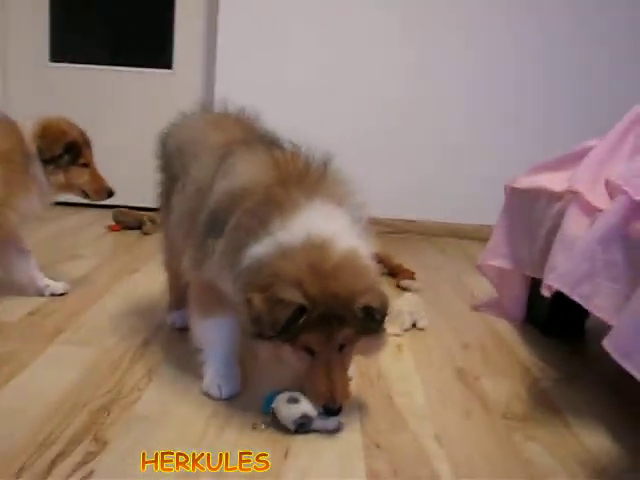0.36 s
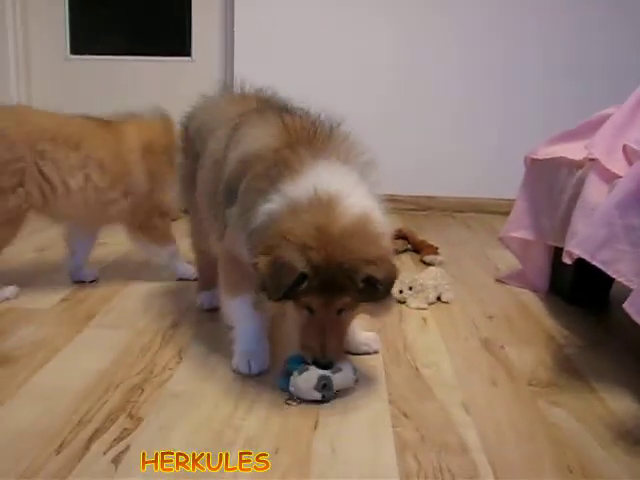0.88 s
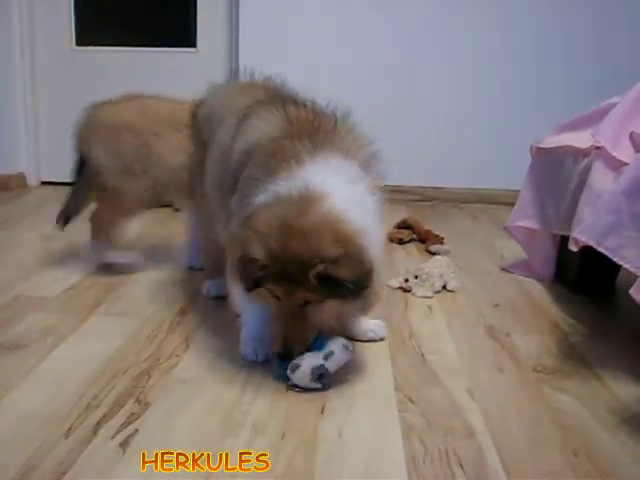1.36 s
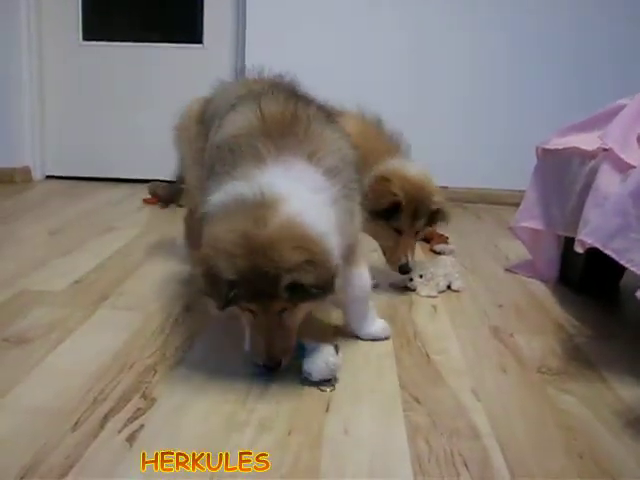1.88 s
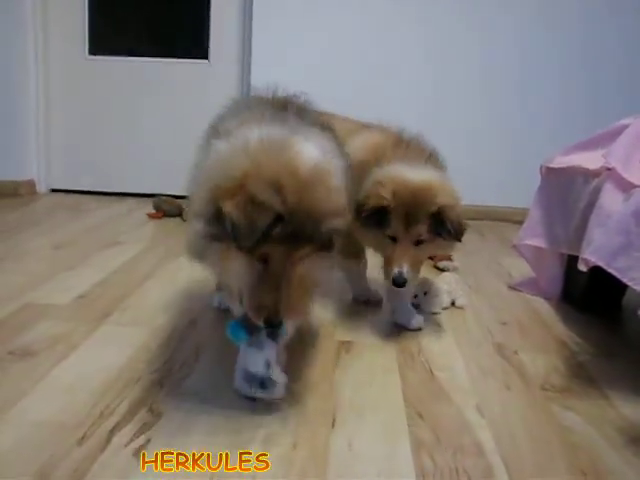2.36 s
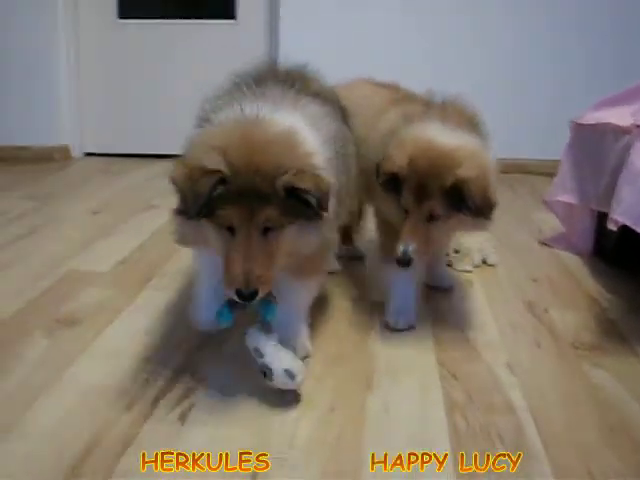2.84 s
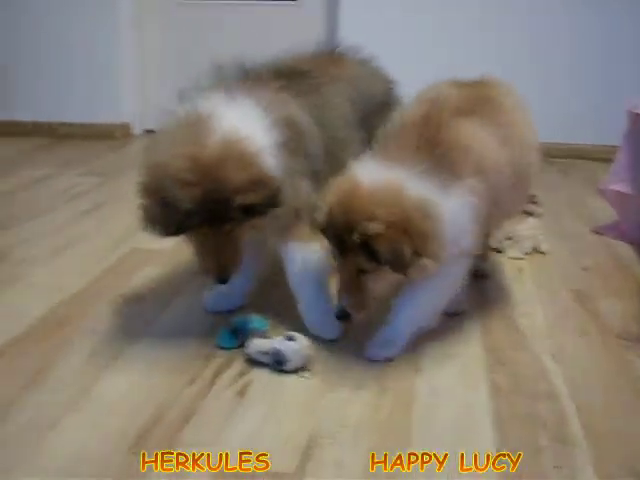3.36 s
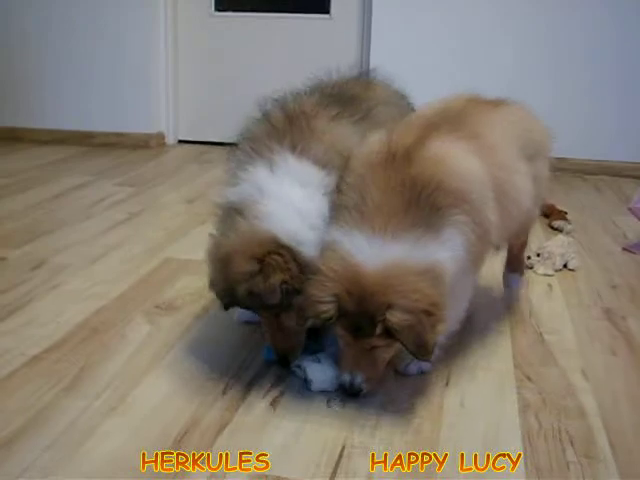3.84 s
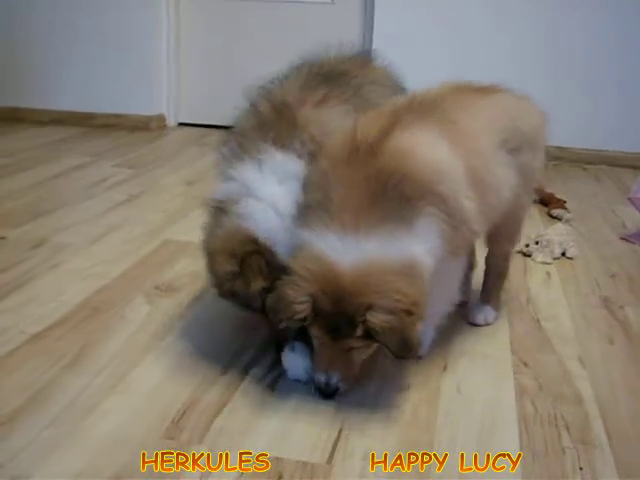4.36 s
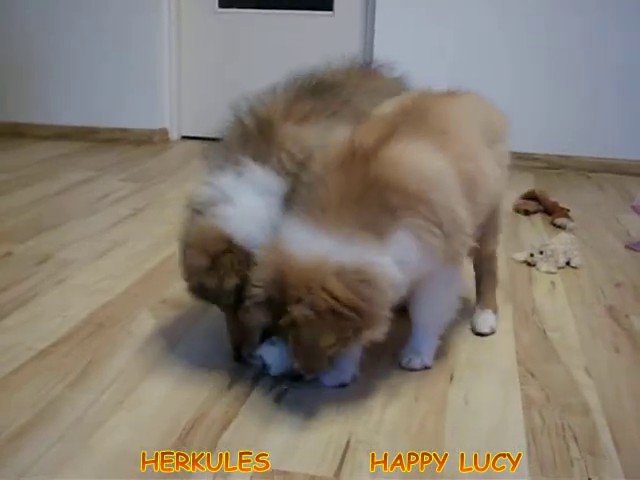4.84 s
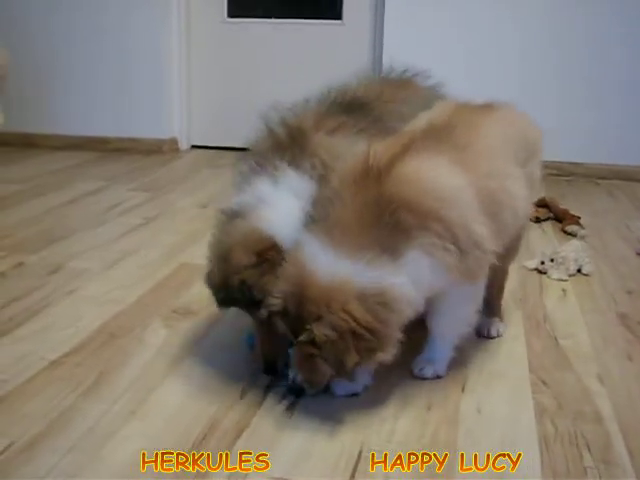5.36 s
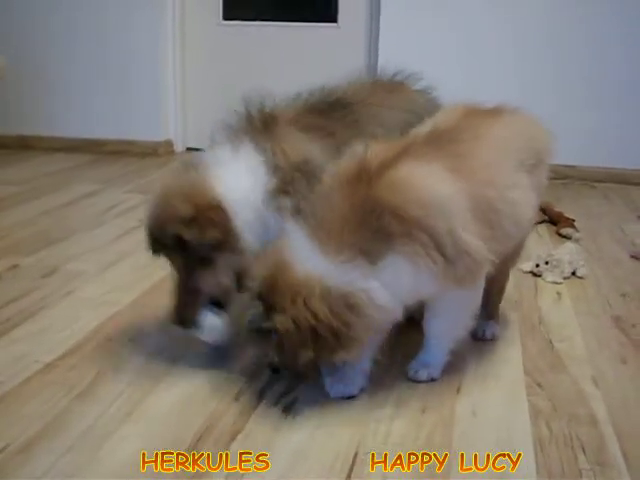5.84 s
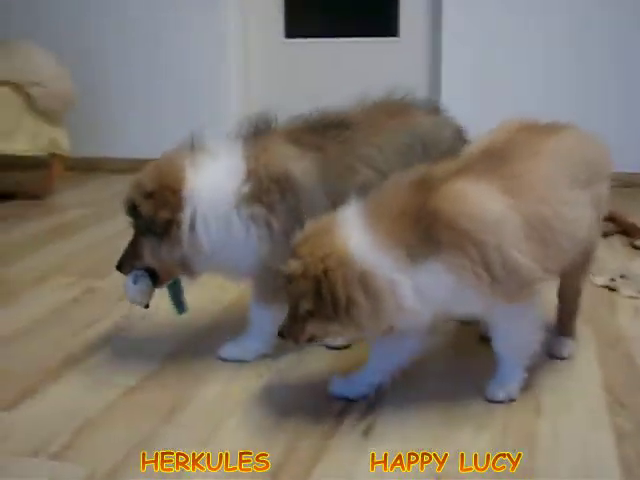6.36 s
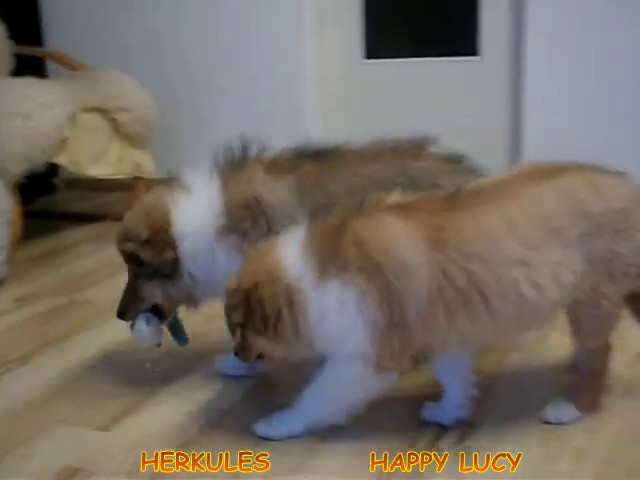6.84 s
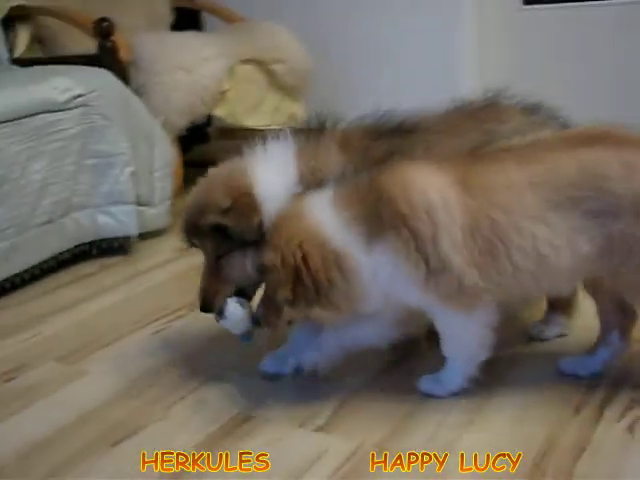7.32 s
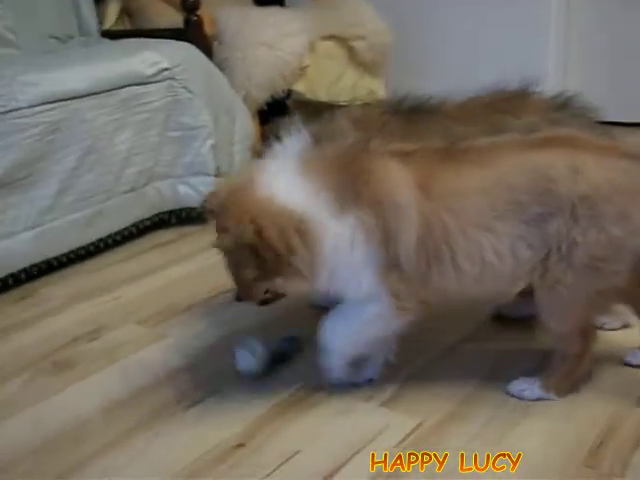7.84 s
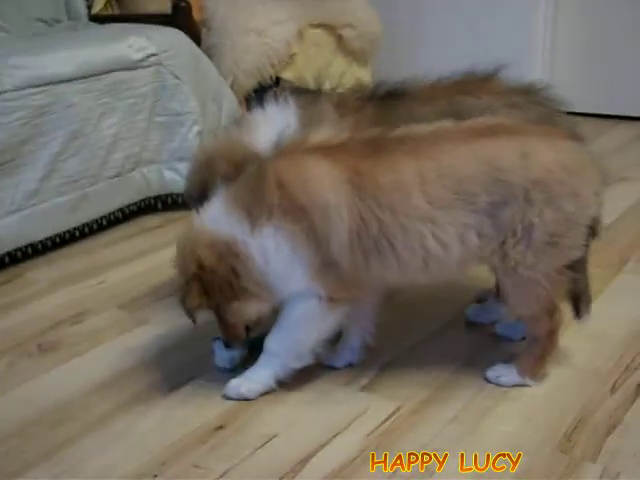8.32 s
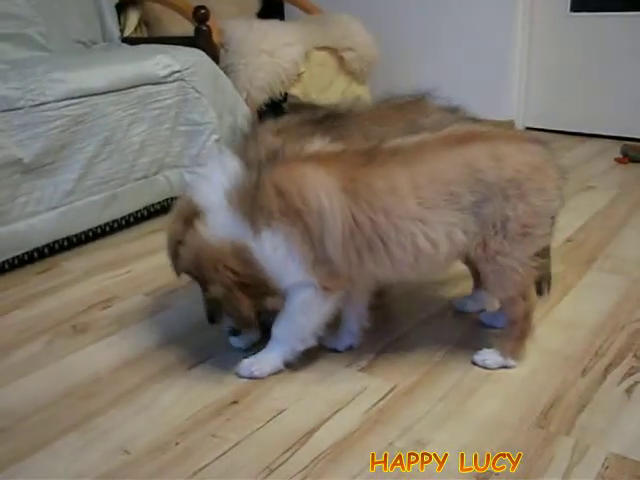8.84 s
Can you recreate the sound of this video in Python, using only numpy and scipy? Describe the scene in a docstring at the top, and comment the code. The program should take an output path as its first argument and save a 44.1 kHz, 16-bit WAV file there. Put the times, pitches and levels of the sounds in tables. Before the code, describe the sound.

Close, bright crumpling and sharp foil pops in a small room, quiet stretch, then one loudest snap with knocks and handling rubs near the end.

```python
"""From the start two puppies chew, paw and drag a crinkly toy over a wooden floor in a small room: its foil
crackles by dense tiny buckles and snaps by single large ones. Throughout, room hiss is filtered noise, a low
hum comes and goes as resonant noise, the camera's sensor whines as a flipping tone and its lens motor buzzes
in spells of pulsed noise. Knocks ring its casing now and then; near 7.9 s comes the loudest snap, gain control
ducks after it, and a hand rubs the casing by stick-slip; near 9.1 s a pad scuffs the boards."""
import sys
import numpy as np
from scipy import signal
from scipy.fft import rfft, irfft, next_fast_len
from scipy.io import wavfile
from scipy.ndimage import uniform_filter1d

SR = 44100
rng = np.random.default_rng(int(sys.argv[2]) if len(sys.argv) > 2 else 0)


def master(y):
    """Save y as 16-bit WAV."""
    cut = np.clip(np.atleast_2d(y).T, -1, 1)
    pcm = np.round(cut * 32767)  # scale
    wavfile.write(sys.argv[1], SR, pcm.astype(np.int16))


def elevation(decibels):
    """Turn decibel levels (scalar or array-like) into linear amplitude ratios."""
    levels = np.asarray(decibels, float)
    return 10 ** (levels / 20)


N = 405719  # length in samples

# Each bite or drag crumples the foil:
# (time at full strength [s], hold [s], bright crackle level [dB], dull over bright [dB])
BITES = [(.02, 0.06, -48, -2.5), (.24, 0.064, -58.5, -1), (0.488, 0.045, -51, -1.5), (.715, 0.016, -42, 1),
         (.95, 0.058, -49.5, -1.5), (1.135, 0.013, -40.5, -3.5), (1.395, 0.026, -48, -0.5),
         (1.52, 0.13, -54.5, 1), (1.7, 0.075, -47.5, -1), (1.83, 0.11, -48, 0.5), (2.02, 0.024, -50, -1),
         (2.12, 0.091, -47.5, -3), (2.208, 0.12, -38, -5.5), (2.39, 0.0089, -46, -6),
         (2.578, 0.028, -30.5, -2.5), (2.689, .01, -31, -5), (2.77, 0.2, -40.5, -3), (2.955, .005, -30, -8),
         (2.99, 0.12, -40, -1.5), (3.24, 0.038, -46.5, -3.5), (3.35, 0.12, -57.5, -1.5),
         (3.494, 0.004, -46, -6), (3.6, 0.0097, -39.5, -6.5), (3.659, 0.052, -38, -6),
         (3.83, 0.059, -43.5, -5), (3.96, 0.11, -56, 3), (4.176, 0.014, -44.5, -3),
         (4.272, 0.15, -52, -5.5), (4.46, 0.04, -49.5, -10), (4.516, 0.056, -36, -8),
         (4.641, 0.084, -40, -2.5), (4.82, .01, -35.5, -6.5), (4.932, 0.056, -42, -2.5),
         (5.01, 0.044, -41.5, -6.5), (5.15, 0.072, -44, -6), (5.345, 0.013, -46.5, -5.5),
         (5.442, 0.1, -45, -4), (5.93, 0.0086, -52, -15), (6.3, 0.043, -65, -15), (6.49, 0.013, -41, -4),
         (6.575, 0.011, -42.5, -3.5), (6.83, 0.017, -50.5, -6.5), (6.863, 0.014, -46, 0),
         (7.034, .02, -44, -9.5), (7.277, 0.0051, -50, -3), (7.38, .04, -54, -4), (7.52, 0.033, -53, -6),
         (7.695, 0.0091, -45.5, -6.5), (7.835, 0.0078, -56, 0), (7.919, 0.012, -29, 4.5),
         (8.0, 0.011, -35.5, 2), (8.09, 0.061, -38.5, -2), (8.27, 0.023, -40.5, -1),
         (8.36, 0.18, -48, -3.5), (8.6, 0.029, -50, -1), (8.83, 0.089, -53, -4), (8.975, 0.0088, -44, -8),
         (9.01, 0.015, -37.5, -1), (9.132, .025, -37, -1.5)]
# Single snaps of the foil: (time [s], bright level [dB], dull over bright [dB])
SNAPS = [(0.0137, -25.5, -5.5), (.0901, -21.5, -9), (.682, -18.5, -10), (.7088, -14.5, 0.5),
         (1.1283, -19, -4), (1.391, -31.5, -0.5), (1.8229, -21.5, 2.5), (1.9, -29, 1.5), (2.2133, -23, -20),
         (2.2756, -16, -6), (2.5738, -7.5, -7.5), (2.5789, -5, -8), (2.582, -5.5, -6.5), (2.6715, -22, 3),
         (2.685, -10.5, -13), (2.689, -7.5, -8), (2.713, -19, -3), (2.7631, -5.5, -10),
         (2.8176, -8.5, -14.5), (2.863, -8.5, -11), (2.898, -15.5, -14), (2.926, -18, -14),
         (2.9463, -7.5, -15), (2.9502, -9.5, -18), (2.9982, -4.5, -14), (3.0908, -18.5, -8),
         (3.116, -19, -6), (3.6044, -17, -15), (3.6406, -9.5, -12), (3.6622, -17.5, -15),
         (3.7205, -22, -28), (4.171, -26, -0.5), (4.5203, -17, -13), (4.532, -23, -12), (4.543, -18, -8),
         (4.5633, -20, -11), (4.6566, -20.5, -7), (4.7536, -17, -9), (4.8035, -6.5, -12.5),
         (4.8164, -17, -19), (4.8202, -21, -11), (4.9444, -11.5, -5.5), (5.0109, -15, -11),
         (5.0403, -15, -11), (5.1469, -15.5, -16), (5.1611, -16, -14), (5.2035, -17.5, -13),
         (5.3105, -21.5, -19), (6.5678, -20.5, -11.5), (7.028, -21, -5.5), (7.6852, -21, -8),
         (7.8987, 3.5, -6.5), (7.9, -7, -8), (7.913, -15, -2), (7.916, -19, -3), (7.965, -9.5, -2.5),
         (7.9996, -7.5, -10), (8.0097, -12, -14), (8.088, -14.5, -7), (8.092, -12, -20), (8.1221, -19, -5),
         (8.129, -11, -14), (8.303, -13.5, -5.5), (8.3699, -24, -22), (9.0153, -12, -18),
         (9.0235, -14.5, -22)]
# Resonances of foil and microphone port: (frequency [Hz], width [Hz], relative level [dB])
BRIGHT_MODES = [(5380, 1306, 4), (6976, 1150, 8.5), (11700, 1600, -40)]
DULL_MODES = [(980, 586, 0), (1800, 1530, 0), (3500, 1570, 4.5)]
# Decay of the room: (frequency [Hz], time to fall 60 dB [s])
ROOM_DECAY = [(300, 0.15), (3000, 0.1), (8000, 0.057), (15000, 0.081)]
# A pad slides on the boards: (time [s], level [dB], fade [dB/s])
SCUFF = (9.063, -35.5, 210)
# Treble response of the microphone: (frequency [Hz], gain [dB])
PORT_RESPONSE = [(3000, -2), (5000, -1), (6800, -1.5), (7900, -1), (8700, -1), (9400, -11), (12000, -3),
                 (16000, -20)]
# Dull knocks, fingers on the casing or paws on the boards:
# (time [s], reference level [dB], left over right [dB], crack over reference [dB], thump over reference [dB])
TAPS = [(0.089, -34, 1.5, -16, -16), (0.283, -29.5, -1, -4.5, -33), (1.317, -34, -5, 3, -8.5),
        (4.17, -44.5, 2.5, -12, -4), (4.667, -46.5, -3, -15, -40), (4.703, -42.5, -3, -3, -19),
        (4.978, -52, 24, 4, 9), (6.145, -44, 6, -16, -26), (7.828, -32, -2, -13, -9),
        (7.839, -26, -2, -9, -12), (7.994, -28, 3, -10, -8.5), (8.02, -29, 2, -17, -22),
        (8.141, -19, -1.5, -12, -22), (8.212, -28.5, -4, -28, -4), (8.672, -28, 13.5, -3.5, -13),
        (8.725, -40, 9, -15, 0.5), (9.007, -34, 8, -14, -8), (9.064, -33.5, 0, -5, -30)]
# Fingernail ticks beside the right port: (time [s], level at that port [dB])
TICKS = [(7.829, -21), (7.839, -26), (8.0145, -8), (8.0192, 5), (8.141, 4.5), (8.212, -19)]
# Rubbing on the casing: (start time [s], length [s], ring level [dB], low thump level [dB])
RUBS = [(7.901, 0.129, -36, -71), (8.274, 0.046, -34, -60), (8.317, 0.02, -35.5, -38),
        (8.367, 0.268, -39.5, -52.5), (8.829, 0.041, -54.5, -50)]
# Resonances of casing and fingernail: (frequency [Hz], width [Hz], relative level [dB])
CASING_MODES = [(620, 163, -6), (870, 54, 9.5), (1328, 350, 0.5), (2210, 310, -8.5)]
LOW_CASING_MODES = [(232, 510, -4), (352, 91, 7)]
NAIL_MODES = [(6140, 4300, -1), (8300, 4500, 1.5), (12700, 2400, -5)]
# Spectrum of room tone and preamp: (frequency [Hz], relative density [dB per Hz])
HISS_SPECTRUM = [(18, -25), (40, -17), (86, -7.5), (194, -12), (330, -6.5), (430, -0.5), (540, -6.5),
                 (721, -11), (822, -4), (1070, -11), (7000, -16), (9200, -21), (12000, -20), (16000, -33)]
# Likeness of the hiss at the two ports: (frequency [Hz], left-right likeness [0 to 1])
HISS_LIKENESS = [(60, 0.89), (180, 0.77), (550, 0.98), (1650, 0.62), (4970, 0.029), (15000, 0.29)]
# Balance of the hiss: (frequency [Hz], left over right [dB])
HISS_BALANCE = [(60, -0.5), (700, 3.5), (3000, -2.5), (12000, -1.5)]
# A low machine somewhere in the house, coming and going: (time [s], level [dB])
HUM_LEVEL = [(0.0, -89), (0.18, -77), (1.28, -79), (2.15, -67), (2.54, -79), (3.3, -61), (3.58, -76),
             (4.1, -65), (4.23, -90), (4.3, -71), (8.97, -80), (9.2, -78)]

BUILD_DB_PER_S, SETTLE_DB_PER_S = 908, 163  # crackle swells fast and settles slowly
PUSH_DB = -7  # soft push of a knock, over its reference level
GRIP_DB_PER_S, SAG_DB_PER_S, LIFT_DB_PER_S = 1500, 14.5, 500  # a stroke grips, weakens, lifts off
WHINE_HZ, FRAME_HZ, FLIP_S = 8265, 30, .0258
MOTOR_S, MOTOR_EVERY_S, MOTOR_RUNS_S = 1.6, 2.026, .67  # a start, the cycle, the spell
MOTOR_STEP_HZ = 264.8


def unit(x):
    """Normalization: scales the signal to rms 1."""
    return x / np.sqrt(np.mean(x ** 2) + 1e-20)


def along(points, hz):
    """Interpolation of (Hz, value) points on a logarithmic frequency axis."""
    f, v = np.transpose(points)
    return np.interp(np.log(hz + 1), np.log(f + 1), v)


def sides(lean_db):
    """Level difference between ports, split evenly into left and right gains."""
    return elevation(np.array([lean_db / 2, -lean_db / 2]))


def swell(s, held, rise, sag, fall):
    """Exponential growth and decay, in dB: rises to 0 at s, sags while held, then falls (rates in dB/s)."""
    t = np.arange(N) / SR - s
    after = -sag * np.minimum(t, held) - fall * np.clip(t - held, 0, None)
    return np.where(t < 0, rise * t, after)


def filtered(x, response):
    """Linear filtering: the spectrum is multiplied by a complex response of frequency."""
    m = next_fast_len(N + SR // 2)
    return irfft(rfft(x, m) * response(np.fft.rfftfreq(m, 1 / SR)), m)[..., :N]


def rung(x, modes):
    """Modal superposition: causal resonances of alternating sign; a unit impulse peaks near 1."""
    def body(f):
        total = 0
        for k, (c, w, db) in enumerate(modes):
            total = total + (-1) ** k * elevation(db) * 1j * f * w / (c * c - f * f + 1j * f * w)
        return total

    impulse_peak = abs(filtered(np.ones(1), body)).max()
    return filtered(x, body) / impulse_peak


def blows(s, gains, rattle, t60, size=160):
    """Impulsive excitation: a sharp blow with a short decaying rattle, different at each port."""
    k = np.arange(size)
    shape = rattle * rng.standard_normal((len(s), 2, size)) * elevation(-60 * k / SR / t60)
    shape[:, :, 0] = 1
    lag = rng.integers(0, 2, (len(s), 2, 1))  # up to one sample between ports
    at = np.clip((s * SR).astype(int)[:, None, None] + lag + k, 0, N - 1)
    shape *= gains.T[:, :, None]
    return np.array([np.bincount(at[:, c].ravel(), shape[:, c].ravel(), N) for c in range(2)])


def grains(count, spread_db, rattle, t60):
    """Shot noise: dense random blows of total rms 1, a few much larger than the rest."""
    when, how_large, where = rng.random((count, 3)).T
    size_db = -spread_db * np.log(1 - .995 * how_large)
    gains = elevation(size_db) * sides(6 * where - 1.5)
    return unit(blows(when * N / SR, gains, rattle, t60, size=64))


def foil_crackle():
    """Crumpling noise: tiny buckles of the foil add in power wherever bites overlap."""
    bright, dull = np.zeros(N + SR), np.zeros(N + SR)
    for s, held, db, over_db in BITES:
        a = max(round(s * SR) - SR // 4, 0)
        level_db = db + swell(s - a / SR, held, BUILD_DB_PER_S, 0, SETTLE_DB_PER_S)[:SR]
        power = elevation(2 * level_db)
        bright[a:a + SR] += power
        dull[a:a + SR] += power * elevation(2 * over_db)
    fine = grains(count=20000, spread_db=4.5, rattle=.3, t60=.003)
    coarse = grains(count=20000, spread_db=3.5, rattle=.5, t60=.004)
    bright_part = np.sqrt(bright[:N]) * unit(rung(fine, BRIGHT_MODES))
    dull_part = np.sqrt(dull[:N]) * unit(rung(0.43 * fine + coarse, DULL_MODES))
    return bright_part + dull_part


def foil_snaps():
    """Impulse response: each large buckle sets off the bright and dull resonances together."""
    s, db, dull_db = np.transpose(SNAPS)
    lean = sides(0.5 + 2.84 * rng.standard_normal(len(s)))
    snaps = rung(blows(s, elevation(db) * lean, rattle=.2, t60=0.0055), BRIGHT_MODES)
    thuds = rung(blows(s, elevation(db + dull_db) * lean, rattle=0.091, t60=0.017), DULL_MODES)
    return snaps + thuds


def scuff():
    """Stick-slip friction: skin slips on varnish in many small jerks, ringing in one band."""
    s, db, fade = SCUFF
    slips = grains(count=12000, spread_db=0.5, rattle=0.3, t60=0.003)
    ring = unit(rung(rung(slips, [(1620, 470, 0)]), [(1620, 680, 0)]))
    return elevation(db + swell(s, 0, GRIP_DB_PER_S, 0, fade)) * ring


def room(x):
    """Diffuse reverberation: each frequency dies at its own rate; a fresh random tail is drawn every 0.2 s."""
    out, step = np.zeros((2, N + SR)), SR // 5
    delay = 120  # samples before the tail
    for a in range(0, N, step):
        hz, t, z = signal.stft(rng.standard_normal((2, SR // 3)), SR, nperseg=256)
        decay = elevation(-60 * t / along(ROOM_DECAY, hz)[:, None])
        tail = signal.istft(z * decay, SR, nperseg=256)[1]
        wet = signal.fftconvolve(x[None, a:a + step], tail / np.linalg.norm(tail[0]), axes=1)
        start = a + delay
        out[:, start:start + wet.shape[1]] += wet[:, :N + SR - start]
    return out[:, :N]


def knocks():
    """Struck shell: a broad push rings the casing, with a sharper crack and a low thump."""
    s, db, lean, crack, thump = np.transpose(TAPS)
    push = blows(s, elevation(db + PUSH_DB) * sides(lean), rattle=0.78, t60=0.024, size=500)
    taps = rung(uniform_filter1d(push, size=15, origin=-7), CASING_MODES)  # soft skin spreads the blow
    cracks = rung(blows(s, elevation(db + crack) * sides(lean), rattle=0.31, t60=0.0048), DULL_MODES)
    thumps = rung(blows(s, elevation([db + thump] * 2), rattle=0.061, t60=0.0024), LOW_CASING_MODES)
    return taps + cracks + thumps


def nail_ticks():
    """Hard contact: short blows ring high, 17 dB weaker at the left port."""
    s, db = np.transpose(TICKS)
    return rung(blows(s, elevation([db - 17, db]), rattle=0.14, t60=0.0093), NAIL_MODES)


def rubbing():
    """Stick-slip friction: finger slips ring the hollow casing, stronger at the left port."""
    ring_gain, low_gain = 0, 0
    for s, held, db, low_db in RUBS:
        stroke_db = swell(s, held, GRIP_DB_PER_S, SAG_DB_PER_S, LIFT_DB_PER_S)
        ring_gain = ring_gain + elevation(stroke_db + db)
        low_gain = low_gain + elevation(stroke_db + low_db)
    slips = grains(count=12000, spread_db=2.5, rattle=.8, t60=.006)
    ring = unit(rung(rung(slips, CASING_MODES), [(870, 630, 0)]))
    low = unit(rung(slips.mean(axis=0), LOW_CASING_MODES))
    return ring * ring_gain * sides(2.9)[:, None] + low * low_gain * sides(3.5)[:, None]


def sensor_whine():
    """Phase reversal: a steady sensor tone turns over at every frame, with a phase offset between ports."""
    t = np.arange(N) / SR
    flip = signal.square(np.pi * FRAME_HZ * (t - FLIP_S))  # one reversal per frame
    phase = np.array([[1.6], [0]])  # left, right [rad]
    tone = np.cos(2 * np.pi * WHINE_HZ * t - phase)
    return elevation([[-57.5], [-45]]) * uniform_filter1d(flip, size=24) * tone


def lens_motor():
    """Amplitude modulation: motor steps pulse noise in a high band, switched on in regular spells."""
    t = np.arange(N) / SR
    running = (t - MOTOR_S) % MOTOR_EVERY_S < MOTOR_RUNS_S
    on = uniform_filter1d(1. * running, size=400)
    steps = elevation(4.5 * np.cos(2 * np.pi * MOTOR_STEP_HZ * t)) * rng.standard_normal((2, N))
    band = [(12500, 2000, 0)]
    return on * elevation([[-70], [-62.5]]) * unit(rung(rung(steps, band), band))


def hiss():
    """Partial coherence: noise of slowly wandering random levels, its likeness set by mid and side shares."""
    z = signal.stft(rng.standard_normal((2, N)), nperseg=512)[2]
    wander = uniform_filter1d(rng.standard_normal(z.shape[1:]), size=8, axis=0)  # over frequency
    wander = uniform_filter1d(wander, size=12, axis=1)  # over time
    noise = signal.istft(z * elevation(1.63 * unit(wander)), nperseg=512)[1][:, :N]

    def mid_side(hz):
        turn = np.arccos(np.clip(along(HISS_LIKENESS, hz), 0, 1)) / 2
        return elevation(along(HISS_SPECTRUM, hz)) * np.array([np.cos(turn), np.sin(turn)])

    mid, side = filtered(noise, mid_side)
    pair = filtered(np.array([mid + side, mid - side]), lambda hz: sides(along(HISS_BALANCE, hz)))
    return elevation(-55.5) * unit(pair)


def house_hum():
    """Narrow resonance: noise through one low mode, its level following the machine."""
    level_db = np.interp(np.arange(N) / SR, *np.transpose(HUM_LEVEL))
    return elevation(level_db) * unit(rung(rng.standard_normal(N), [(45.3, 4.8, 0)]))


def scene():
    """Superposition: toy and scuff through the microphone response, plus handling, camera and background."""
    crackle, snaps = foil_crackle(), foil_snaps()
    wet = room((elevation(-9) * snaps + elevation(-4) * crackle).mean(axis=0))
    toy = elevation(1.0) * crackle + snaps + wet
    airborne = filtered(toy + scuff(), lambda hz: elevation(along(PORT_RESPONSE, hz)))
    handling = knocks() + nail_ticks() + rubbing()
    return airborne + handling + sensor_whine() + lens_motor() + hiss() + house_hum()


def top_cut(x):
    """Nothing passes above the cut-off."""
    return signal.sosfilt(signal.butter(12, 16450, fs=SR, output="sos"), x)


def record(dry):
    """Gain control: drops by up to 3 dB after a near-overload and creeps back; peaks clip."""
    t = np.arange(N) / SR
    peak_db = 20 * np.log10(abs(dry).max(axis=0) + 1e-9)
    over_db = np.clip(peak_db + 3, 0, 3)  # excess over -3 dB of full scale
    creep_db = 0.07 * t  # recovery at 0.07 dB/s
    duck_db = np.clip(np.maximum.accumulate(over_db + creep_db) - creep_db, 0, None)
    gain = elevation(-uniform_filter1d(duck_db, size=441, origin=220))  # 10 ms average, looking back
    return top_cut(np.clip(dry * gain, -1, 1))


dry = scene()
out = record(dry)
master(out)
```